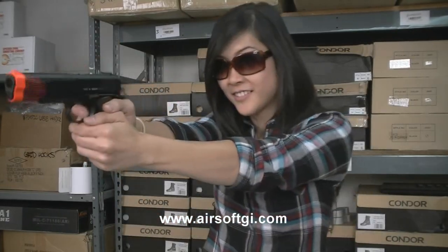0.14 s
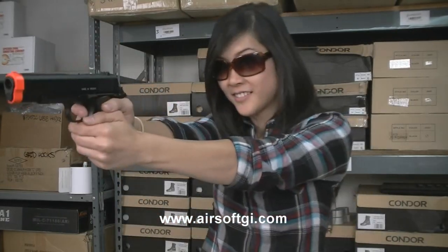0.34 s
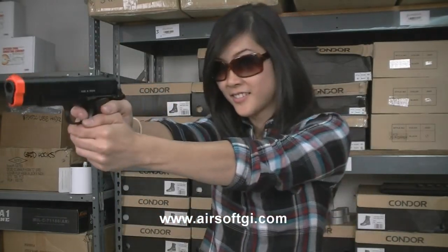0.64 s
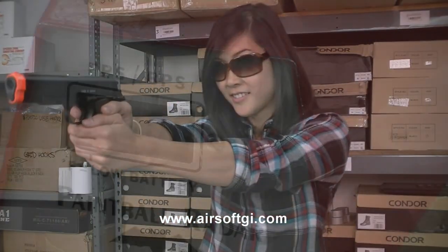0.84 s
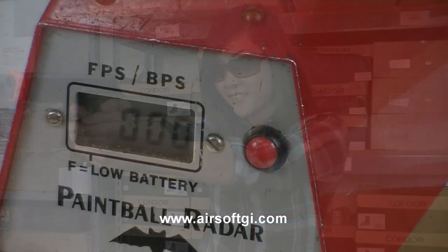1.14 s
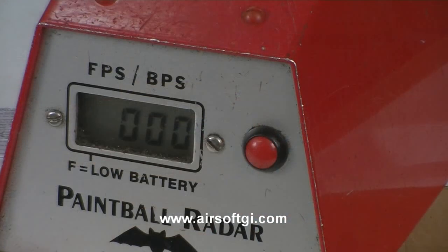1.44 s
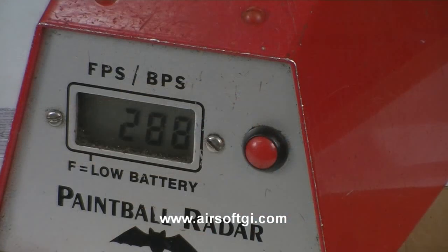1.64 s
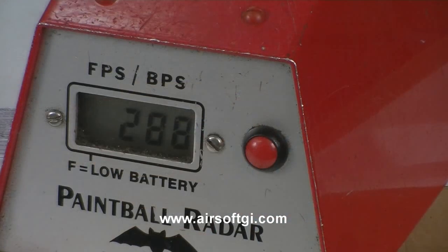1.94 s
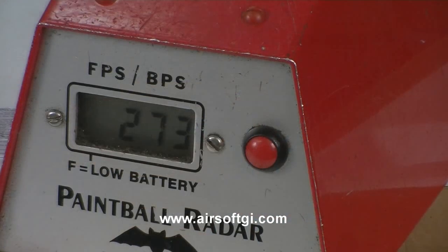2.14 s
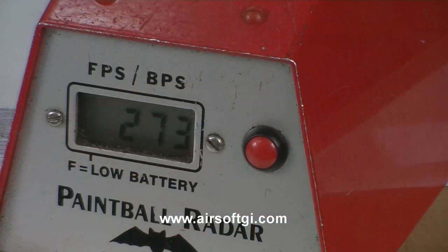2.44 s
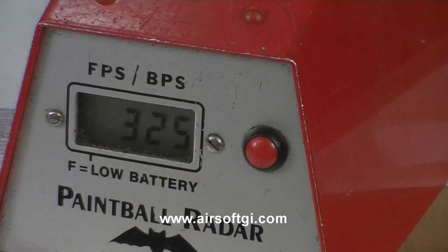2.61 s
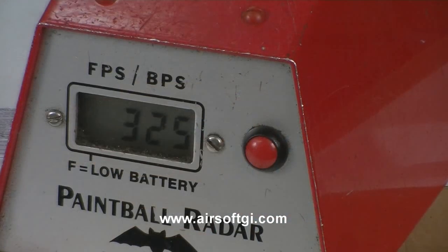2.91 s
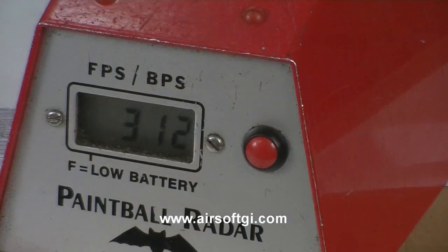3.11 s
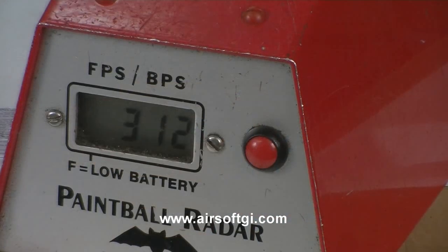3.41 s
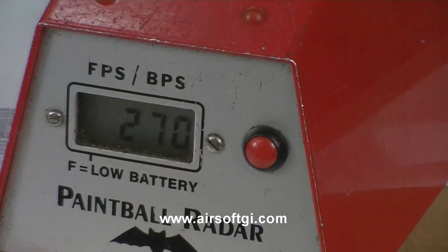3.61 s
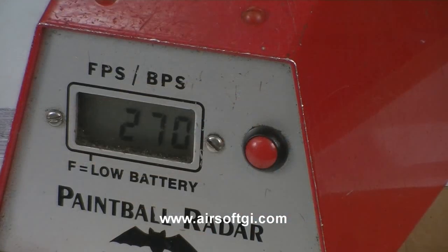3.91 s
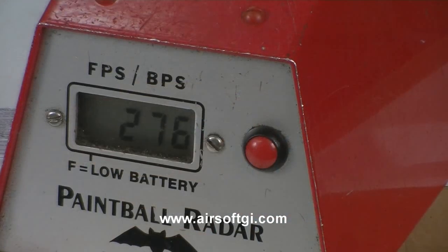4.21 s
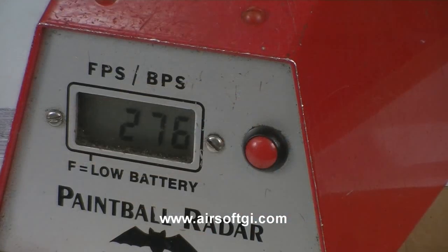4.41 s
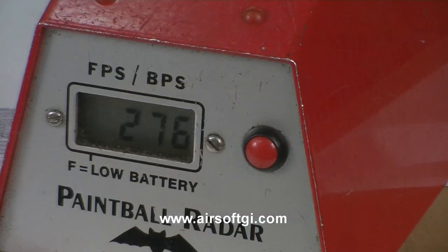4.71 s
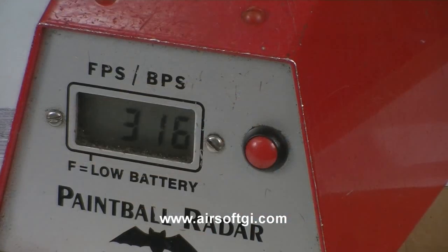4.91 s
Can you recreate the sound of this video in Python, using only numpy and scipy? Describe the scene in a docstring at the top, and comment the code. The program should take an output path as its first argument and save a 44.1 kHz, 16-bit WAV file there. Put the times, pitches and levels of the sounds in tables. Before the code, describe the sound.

A gas blowback pistol is fired ten times at a steady, slightly slowing pace. The shots are dry, clattering double snaps with hissy gas bursts; the first three are lighter in body, later ones thump more. Short wall echoes and a diffuse indoor tail follow. Trigger ticks, damped taps, a pellet-like clack and a soft bump fill the gaps over quiet air hiss. Close microphone, compressed peaks, occasional low puffs.

```python
"""Gas pistol in a stockroom

Ten shots of a gas blowback airsoft pistol: steel clashes, gas spurts and sizzle are coloured noise; slide and frame are modes.
Trigger ticks, knocks, a bump and a clack are brief noise; a hollow ring, as of a long tube, is strong only at first.
Room tail is noise following the source energy per band, plus wall echoes; the recorder's gain control ducks each crack."""
import sys
import numpy as np
from scipy import signal
from scipy.io import wavfile
from scipy.ndimage import uniform_filter1d

SR = 44100
rng = np.random.default_rng(int(sys.argv[2]) if len(sys.argv) > 2 else 0)


def dump_mix(stems):
    """Bounce the given channels to the path in sys.argv[1] as a 16-bit WAV at rate SR."""
    frames = np.atleast_2d(stems).T  # one column per channel
    limited = np.clip(frames, -1, 1)  # hard clip at full scale
    pcm = np.round(limited * 32767).astype(np.int16)
    wavfile.write(sys.argv[1], SR, pcm)


N = 222740

# shots: (valve strike [s], steel level [dB], sizzle level [dB], gas level [dB], frame thump level [dB],
#         slide home after strike [s], gust level at the microphone [dB], gust after strike [s])
SHOTS = [(0.0608, -6, -12, -3, -6, .0172, -13.5, 0.013),
         (0.4556, -10, -4.5, -1.5, -13, 0.018, -15.5, 0.0018),
         (0.8978, -12.5, -13.5, -7.5, -13, 0.015, -19.5, 0.0042),
         (1.3573, -2, -13.5, -1, 0.5, 0.021, -41, .012), (1.879, -1, -10, 2, 5, 0.021, -5, .012),
         (2.373, 2, -10.5, 1.5, 8.5, 0.02, -15, .017), (2.868, -1.5, -3.5, 3, 6, .0195, -40, 0.005),
         (3.4144, -2, -22, -1.5, 0.5, 0.02, -25, 0.016), (3.9986, -4, -18.5, -5.5, 2, 0.019, -21.5, 0.0083),
         (4.601, -3.5, -12.5, -4.5, 6, 0.02, -23, 0.0072)]
# stereo width of the noise: "near" for the direct sound, "room" for the diffuse tail: (frequency [Hz], side
# minus mid [dB])
DIRECTIONS = {"near": [(100, 6.5), (300, -1.5), (700, -4), (2000, -7.5), (4500, -11), (8000, -6.5),
                       (14000, -11)], "room": [(100, -16), (300, -21), (700, -15.5), (2000, -10),
                                                   (4500, -9), (8000, -6), (14000, 18)]}
# light parts and test stand: knock bandwidth, send to the room, side minus mid
KNOCK_OCTAVES, KNOCK_ROOM_DB, STAND_SIDE_DB = 1.12, 2.5, -7


def from_db(db):
    """Decibels to amplitude gain."""
    return 10 ** (np.asarray(db) / 20)


def at_hz(points, hz):
    """Interpolate a table on a log-frequency axis."""
    freqs, values = np.transpose(points)
    return np.interp(np.log(hz), np.log(freqs), values)


def add(track, s, sound):
    """Mix a sound into a track from time s on."""
    start = int(round(s * SR))
    part = sound[..., :N - start]
    track[..., start:start + part.shape[-1]] += part


def burst(fade_s):
    """Contact envelope: instant onset, exponential decay with time constant fade_s."""
    return np.exp(-np.arange(SR // 5) / SR / fade_s)


def band_pass(x, low_hz, high_hz):
    """Keep what lies between two frequencies."""
    return signal.sosfilt(signal.butter(2, [low_hz, high_hz], "band", fs=SR, output="sos"), x)


def to_stereo(mid, side):
    """Mid and side to left and right."""
    return mid + side * [[1], [-1]]


def drift(rate_hz):
    """Random curve: straight lines between normal draws, rate_hz of them a second."""
    return np.interp(np.arange(N) / SR * rate_hz, np.arange(1000), rng.standard_normal(1000))


def noise_bands(width):
    """Third-octave slices of white stereo noise: (low Hz, high Hz, centre Hz, sound)."""
    edges_hz = 35 * 2 ** (np.arange(28) / 3)
    white = rng.standard_normal((2, 2, N))
    for k, (low_hz, high_hz) in enumerate(zip(edges_hz, edges_hz[1:])):
        hz = np.sqrt(low_hz * high_hz)
        mid, side = band_pass(white[k % 2], low_hz, high_hz)   # neighbouring bands are independent
        spread = from_db(at_hz(width, hz))
        yield low_hz, high_hz, hz, to_stereo(mid, spread * side) / np.hypot(1, spread)


def noise(spectrum, bands):
    """Weighted sum of noise bands, scaled to rms 1."""
    out = sum(from_db(at_hz(spectrum, hz)) * band for _, _, hz, band in bands)
    return out / out.std()


def ring(drive, hz, t60_s):
    """Two-pole resonator; a unit click gives a decaying wave of height 1."""
    r = np.exp(-np.log(1000) / (t60_s * SR))
    w = 2 * np.pi * hz / SR
    floor = 1e-18 * rng.standard_normal(N)   # keeps the filter out of denormals
    return signal.lfilter([.5, 0, -.5], [1, -2 * r * np.cos(w), r * r], drive + floor)


def struck(blows, modes, vary_db):
    """Blows (s, dB) ring a body's modes, with random strength per blow, mode and side."""
    times_s, levels_db = np.transpose(blows)
    at = np.round(times_s * SR).astype(int)
    out = np.zeros((2, N))
    for hz, db, t60_s in modes:
        chance_db = vary_db * rng.standard_normal((2, len(at)))
        clicks = np.zeros((2, N))
        clicks[:, at] = from_db(levels_db + db + chance_db)
        out += ring(clicks, hz, t60_s)
    return out


def air(bands):
    """Steady coloured noise of the quiet air."""
    # (frequency [Hz], relative density [dB per Hz])
    hiss = [(40, -35), (80, -2.5), (150, -9.5), (300, -1.5), (700, 5), (1500, 1), (3000, -4), (6000, -12),
            (10000, -14), (15500, -35)]
    return from_db(-53.5) * noise(hiss, bands)


def stockroom(source, build_s=0.011, patchy_db=1.45):
    """Diffuse tail: each band fills with source energy and drains, unevenly, at its own rate."""
    # tail against the direct sound: (frequency [Hz], level [dB])
    tail_levels = [(60, -39), (150, -23), (300, -11), (500, -11), (900, -7), (2000, -3.5), (3000, -1),
                   (4500, -6), (7000, -9), (10000, -4.5), (15000, -21)]
    # (frequency [Hz], t60 [s])
    tail_t60 = [(100, 0.26), (400, 0.25), (1000, 0.51), (2500, 0.53), (5000, 0.44), (7300, 0.39),
                (10000, 0.21), (14000, 0.09)]
    # sound already in the room at the start, ahead of the tail gain: (frequency [Hz], level per band [dB])
    lingering = [(100, -66), (600, -47.5), (3000, -45.5), (8000, -48.5), (14000, -75)]
    out = 0
    fill = np.exp(-1 / (build_s * SR))
    swells = drift(90)   # shared by all bands
    for low_hz, high_hz, hz, band in noise_bands(DIRECTIONS["room"]):
        drain = np.exp(-2 * np.log(1000) / (at_hz(tail_t60, hz) * SR))
        fed = band_pass(source, low_hz, high_hz) ** 2
        energy = signal.lfilter([(1 - fill) * (1 - drain)], [1, -fill - drain, fill * drain], fed)
        energy = energy + from_db(at_hz(lingering, hz)) ** 2 * drain ** np.arange(N)
        gain = from_db(at_hz(tail_levels, hz) + patchy_db * (1.5 * swells + drift(35)))
        out = out + gain * np.sqrt(np.abs(energy)) * band / band.std()
    return out


def tube(pitch_hz=127.6, count=36, t60_s=1.0, delay_s=.019):
    """Air column, perhaps in the line of fire: each shot rings multiples of one pitch, from the fourth up."""
    # (frequency [Hz], relative level [dB])
    overtones = [(380, -72), (510, -58.5), (640, -61.5), (800, -59), (1150, -64.5), (1280, -54),
                 (1600, -59), (1800, -47.5), (2040, -52.5), (2200, -58), (2430, -60), (2950, -64),
                 (3190, -52), (3330, -55.5), (3500, -76), (3830, -62.5), (5000, -62.5)]
    level_db, near_until_s, fade_db_per_s = 18, .7, 23
    blows = [(0.0047, -19.5)]   # already ringing faintly at the start
    blows += [(s + delay_s, 0) for s, *_ in SHOTS]
    out = 0
    for hz in pitch_hz * (4 + np.arange(count)):
        # overtones start out of step, within one period, so the ring is smooth
        scattered = [(s + rng.random() / pitch_hz, db) for s, db in blows]
        out = out + struck(scattered, [(hz, at_hz(overtones, hz), t60_s)], vary_db=1.0)
    away_s = np.maximum(np.arange(N) / SR - near_until_s, 0)
    return from_db(level_db - fade_db_per_s * away_s) * out


def trigger(bands, fade_s=0.00078, lag_s=.0013):
    """Linkage contacts: each pull or reset is a double tick, each tick with a rap on the frame."""
    # trigger pulled before a shot: (movement [s], level [dB])
    pulls = [(0.0301, -19.5), (0.4165, -34), (0.4274, -22), (0.8596, -18.5), (1.7945, -23.5),
             (2.3256, -17.5), (2.824, -16.5), (3.3636, -17.5), (3.946, -20.5), (4.5469, -19.5)]
    # trigger let go after a shot: (movement [s], level [dB])
    resets = [(0.286, -33), (0.685, -29.5), (1.2375, -44), (1.665, -23), (2.1765, -23), (2.6913, -22.5),
              (3.162, -23.5), (3.812, -20.5), (4.3349, -20), (4.8938, -20.5)]
    # (frequency [Hz], relative density [dB per Hz])
    small_click = [(60, -60), (500, -36.5), (2000, -30), (4500, -19), (7000, 8), (9500, 10.5),
                   (12000, -9.5), (15500, -20)]
    frame_click = [(60, -34), (300, -17), (900, -15), (1800, 3), (4000, 5), (8000, -26), (15500, -1)]
    tick, rap = np.zeros(N), np.zeros(N)
    # (moves, first tick [dB], second tick [dB], gap [s], rap against tick [dB])
    for moves, first_db, second_db, gap_s, rap_db in ((pulls, -2, -9.5, .006, -20.5),
                                                      (resets, -3, -6, .0022, -9)):
        for s, db in moves:
            for delay_s, tick_db in ((0, first_db), (gap_s, second_db)):
                contact = from_db(db + tick_db) * burst(fade_s)
                add(tick, s + lag_s + delay_s, contact)
                add(rap, s + lag_s + delay_s, from_db(rap_db) * contact)
    clicks = tick * noise(small_click, bands) + rap * noise(frame_click, bands)
    return band_pass(clicks, 600, 13000)   # parts this small radiate no bass


def pistol(bands, gas_brevity=0.52):
    """Each stage is a steel clash with sizzle and a shorter gas spurt; clashes ring the slide, spurts the frame."""
    # hammer release, valve strike, gas burst, slide unlocks, rear stop:
    # (after the strike [s], steel level [dB], gas level [dB], steel fade [s])
    cycle = [(-.008, -28.5, -33.5, 0.0051), (.0002, -7.5, -24.5, 0.0002), (.0021, -5.5, -7.5, 0.026),
             (.0048, -2, -9, 0.00087), (0.0112, -2.5, -1, 0.0016)]
    # (steel level [dB], gas level [dB], steel fade [s])
    slide_home = (0, -1.5, 0.011)
    # colours: (frequency [Hz], relative density [dB per Hz]); sizzle is a bright treble layer on each steel
    # clash
    steel_colour = [(60, -37.5), (1000, -31.5), (2500, -16), (3600, -13.5), (5200, -2), (6600, 3),
                    (8500, -0.5), (11000, -14.5), (15500, -38)]
    sizzle_colour = [(60, -66), (5500, -25.5), (7200, -14), (8500, 7), (10500, -10.5), (12500, -22),
                     (15500, -32)]
    gas_colour = [(60, -29), (150, -2), (300, 1), (500, 4.5), (800, 6), (1400, 3), (2000, 4.5), (2600, 0.5),
                  (3600, -3), (5000, -8.5), (9000, -8.5), (15500, -11)]
    # slide and barrel, frame in the hands: (frequency [Hz], relative level [dB], t60 [s])
    slide_modes = [(4243, -29, 0.12), (4733, -28.5, 0.052), (6050, -44, .06), (6580, -16, 0.049),
                   (6864, -13.5, 0.014), (8400, -32.5, 0.045), (9040, -29, 0.056), (8800, -35.5, .05)]
    frame_modes = [(157, -32.5, 0.08), (228, -19.5, 0.029), (372, -31.5, 0.038), (494, -21, 0.1),
                   (620, -17.5, 0.027), (746, -21.5, 0.046)]
    steel, sizzle, gas = np.zeros((3, N))
    clashes, spurts = [], []
    for s, steel_db, sizzle_db, gas_db, frame_db, travel_s, *_ in SHOTS:
        for delay_s, clash_db, spurt_db, fade_s in [*cycle, (travel_s, *slide_home)]:
            at_s = s + delay_s
            add(steel, at_s, from_db(steel_db + clash_db) * burst(fade_s))
            add(sizzle, at_s, from_db(sizzle_db + clash_db) * burst(fade_s))
            add(gas, at_s, from_db(gas_db + spurt_db) * burst(fade_s * gas_brevity))
            clashes.append((at_s, steel_db + clash_db))
            spurts.append((at_s, frame_db + spurt_db))
    crack = steel * noise(steel_colour, bands)
    crack = crack + sizzle * noise(sizzle_colour, bands)
    crack = crack + gas * noise(gas_colour, bands)
    slide = from_db(12.0) * struck(clashes, slide_modes, vary_db=4.5)
    frame = struck(spurts, frame_modes, vary_db=2.5)
    return crack + slide + frame


def wall_echoes(source):
    """Hard surfaces nearby throw the crack back, without its bass."""
    # (delay [s], level [dB])
    echoes = [(.026, -14.5), (.0365, -54), (.0445, -22), (.056, -22.5), (0.0712, -23.5), (.1, -27)]
    out = np.zeros((2, N))
    thin = band_pass(source, 700, 12000)
    for delay_s, db in echoes:
        add(out, delay_s, from_db(db) * thin)
    return out


def gusts(hz=115, t60_s=0.01, lag_s=0.0031):
    """A puff of gas gives one low swing at the microphone, reaching the left port first."""
    pushes = np.zeros((2, N))
    for s, *_, db, delay_s in SHOTS:
        add(pushes[0], s + delay_s, from_db([db]))
        add(pushes[1], s + delay_s + lag_s, from_db([db]))
    return from_db(12.0) * band_pass(ring(pushes, hz, t60_s), 25, 314)


def damped_hits(hits):
    """Band-limited noise bursts (s, dB, Hz, octaves, fade s): direct sound and send to the room."""
    direct, sent = np.zeros((2, N)), np.zeros(N)
    for s, db, hz, octaves, fade_s in hits:
        ratio = 2 ** (octaves / 2)
        low_hz, high_hz = hz / ratio, hz * ratio
        body = band_pass(burst(fade_s) * rng.standard_normal((2, SR // 5)), low_hz, high_hz)
        level = from_db(db) * np.sqrt(SR / 2 / (high_hz - low_hz))   # offsets the power lost to the filter
        mid, side = level * body
        add(direct, s, to_stereo(mid, from_db(STAND_SIDE_DB) * side))
        add(sent, s, from_db(KNOCK_ROOM_DB) * mid)
    return direct, sent


def knocks():
    """Light, damped knocks, each a noise burst around its own pitch; the loud one at 1.433 s is perhaps a
    pellet striking something."""
    # (time [s], level [dB], centre [Hz], fade [s])
    taps = [(1.294, -46, 300, .016), (1.433, -16, 977, 0.006), (1.774, -45.5, 944, 0.014),
            (2.141, -44, 475.5, 0.014), (2.7923, -34, 1064, 0.0085), (3.163, -43, 420, 0.011),
            (3.187, -35.5, 1080, 0.025), (3.348, -41, 1800, .0075), (4.557, -41, 820, 0.031)]
    return damped_hits([(s, db, hz, KNOCK_OCTAVES, fade_s) for s, db, hz, fade_s in taps])


def clack(hit_s=3.7142):
    """Sharp clack, perhaps a stray pellet: a tick, then the rattle of what it hit."""
    # (after the hit [s], level [dB], centre [Hz], width [octaves], fade [s])
    parts = [(0, -5, 5800, 0.84, 0.00023), (.004, -30, 1730, 2, 0.017)]
    return damped_hits([(hit_s + delay_s, *part) for delay_s, *part in parts])


def bump(s=3.894, db=-52, fade_s=0.031, room_db=5):
    """A soft scuff drives the stand's modes: direct sound and send to the room."""
    # (frequency [Hz], relative level [dB], t60 [s])
    stand_modes = [(253, -5, 0.029), (400, 1, .05), (583, -6, .05), (646, -7, 0.073), (1080, -7, 0.028),
                   (1310, -11, 0.031), (2320, -14, 0.1)]
    scuff = np.zeros((2, N))
    rub = burst(fade_s) * rng.standard_normal((2, SR // 5))
    add(scuff, s, from_db(db) * band_pass(rub, 180, 2500))
    mid, side = sum(from_db(mode_db) * ring(scuff, hz, t60_s) for hz, mode_db, t60_s in stand_modes)
    return to_stereo(mid, from_db(STAND_SIDE_DB) * side), from_db(room_db) * mid


def scene():
    """Pistol, trigger, knocks, bump and clack with their room, plus tube ring, gusts and air noise."""
    near = list(noise_bands(DIRECTIONS["near"]))
    ticks, shots = trigger(near), pistol(near)
    taps, taps_sent = knocks()
    pellet, pellet_sent = clack()
    thud, thud_sent = bump()
    sent = shots[0] + from_db(-0.5) * ticks[0] + taps_sent + pellet_sent + thud_sent
    direct = shots + ticks + taps + pellet + thud
    return direct + wall_echoes(shots) + stockroom(sent) + tube() + gusts() + air(near)


def gain_control(x, limit_db, release_db_per_s):
    """Gain drops quickly when the short-term level passes the limit and creeps back at a fixed rate."""
    power = uniform_filter1d(np.mean(x ** 2, axis=0), size=130)   # 3 ms window
    level_db = 10 * np.log10(np.maximum(power, 1e-12))
    creep_db = release_db_per_s * np.arange(N) / SR
    duck_db = np.maximum.accumulate(np.maximum(level_db - limit_db, 0) + creep_db) - creep_db
    return x * from_db(-uniform_filter1d(duck_db, size=40))


def record(dry):
    """Bass roll-off, gain control, rounded peaks and a steep top cut."""
    heard = signal.sosfilt(signal.butter(1, 50, "high", fs=SR, output="sos"), dry)
    held = gain_control(heard, limit_db=-9.5, release_db_per_s=65.5)
    rounded = .75 * np.tanh(held / .75)
    return signal.sosfilt(signal.ellip(10, .1, 80, 15800, fs=SR, output="sos"), rounded)


dry = scene()
out = record(dry)
dump_mix(out)
```